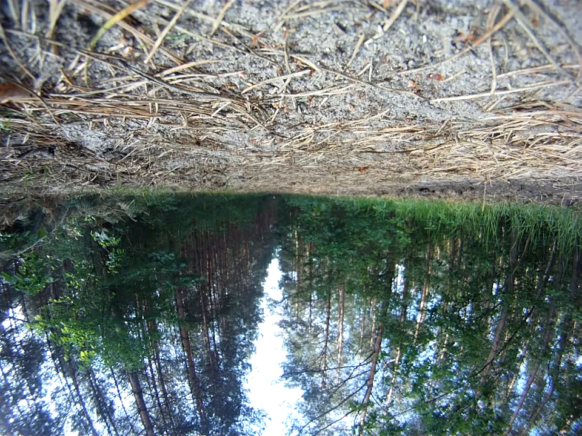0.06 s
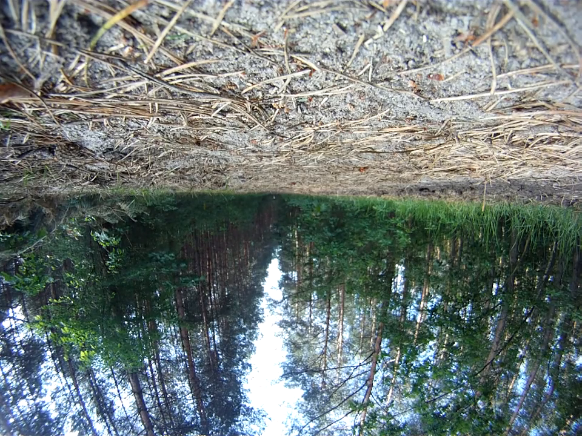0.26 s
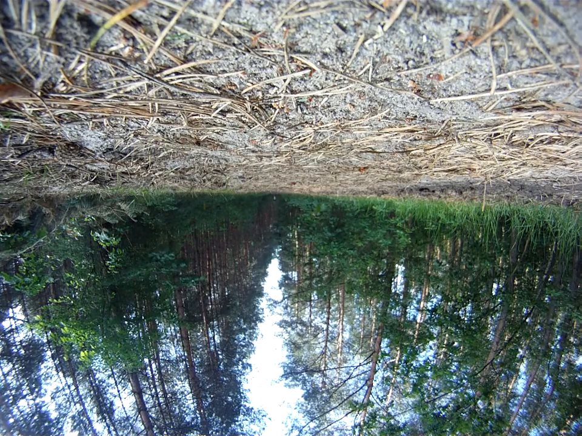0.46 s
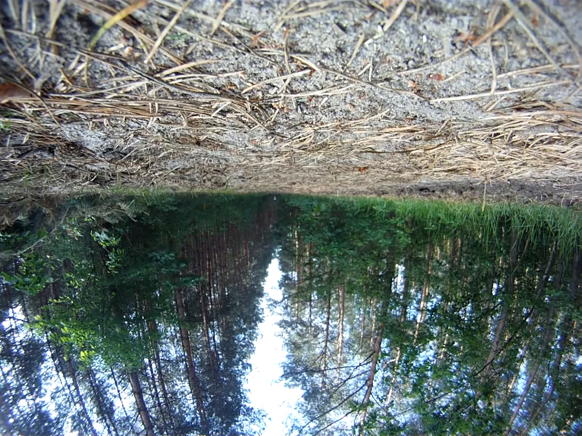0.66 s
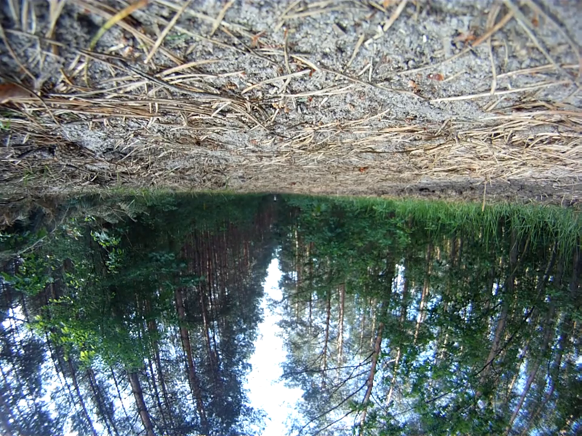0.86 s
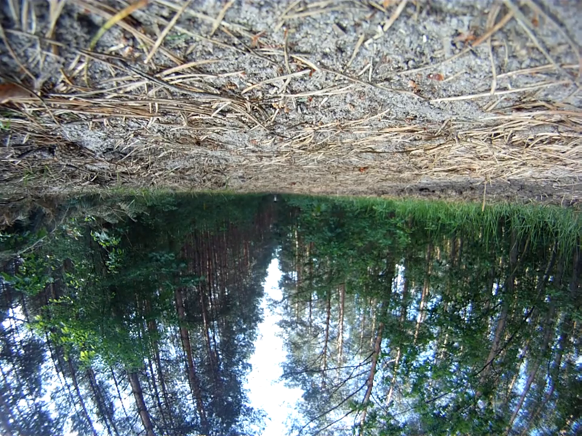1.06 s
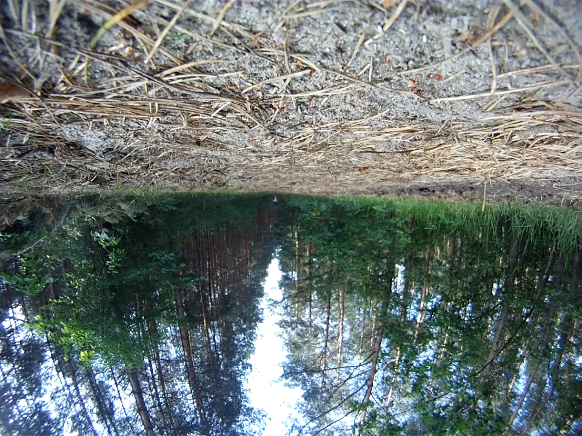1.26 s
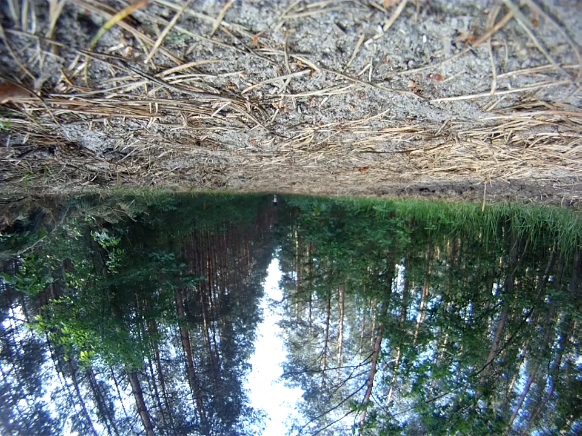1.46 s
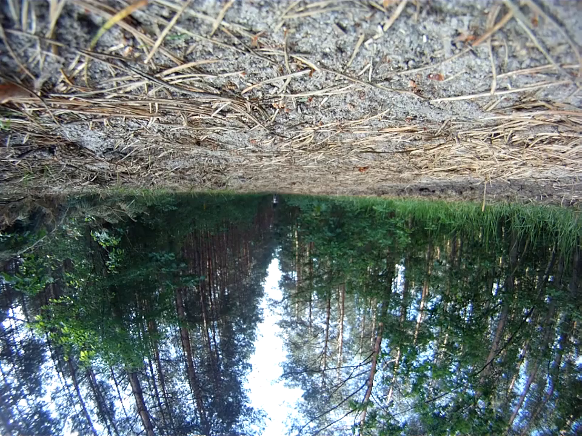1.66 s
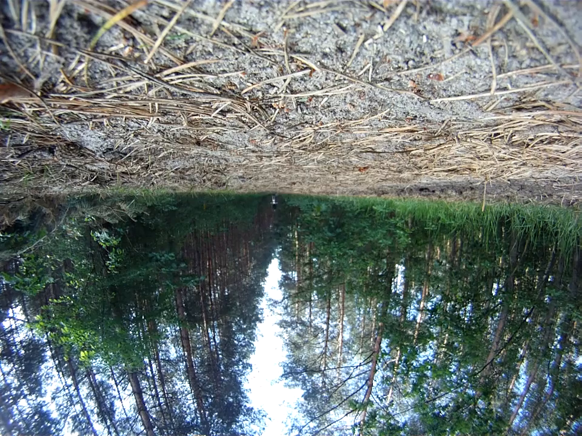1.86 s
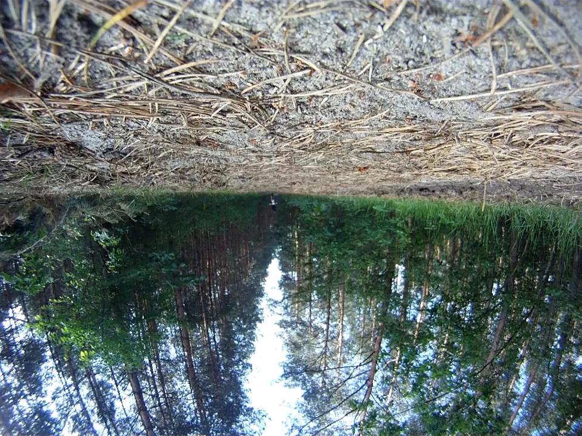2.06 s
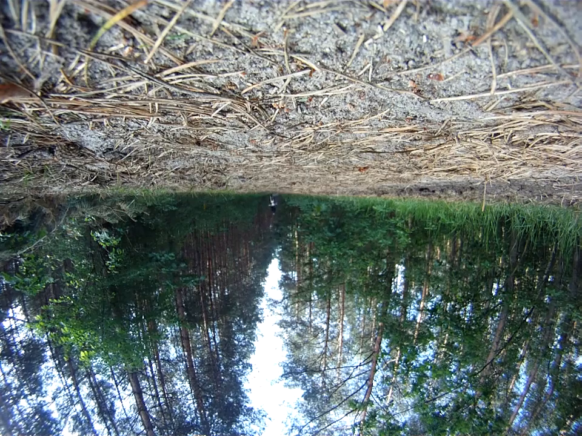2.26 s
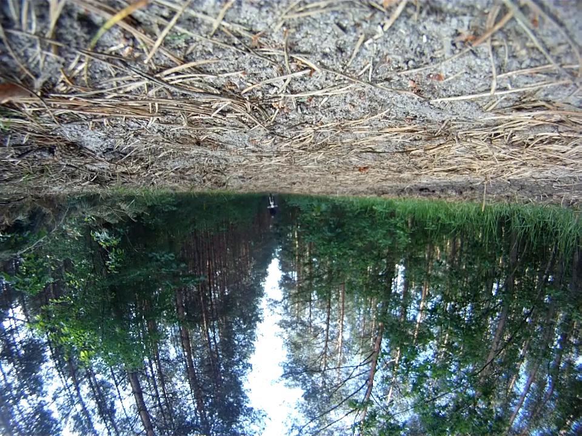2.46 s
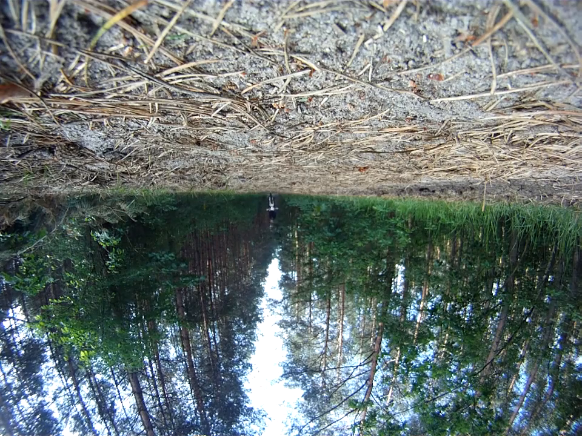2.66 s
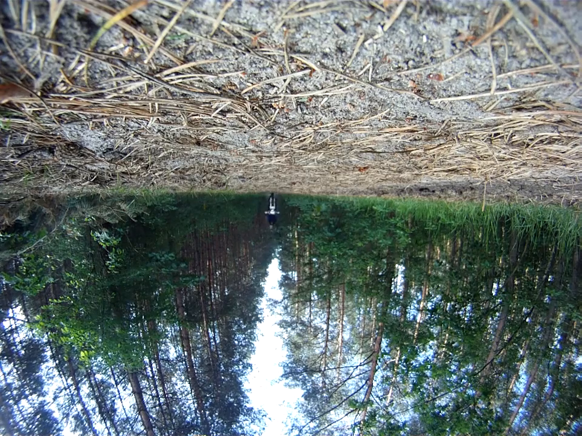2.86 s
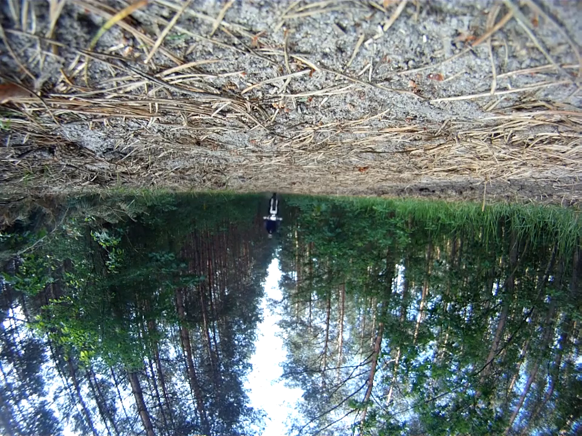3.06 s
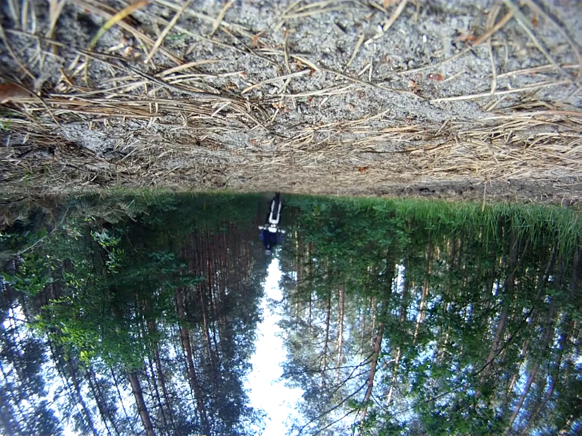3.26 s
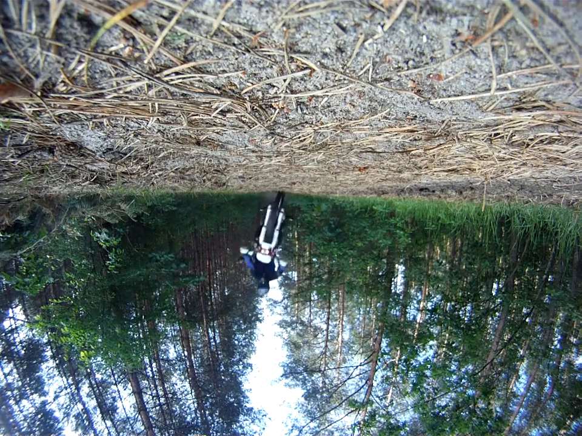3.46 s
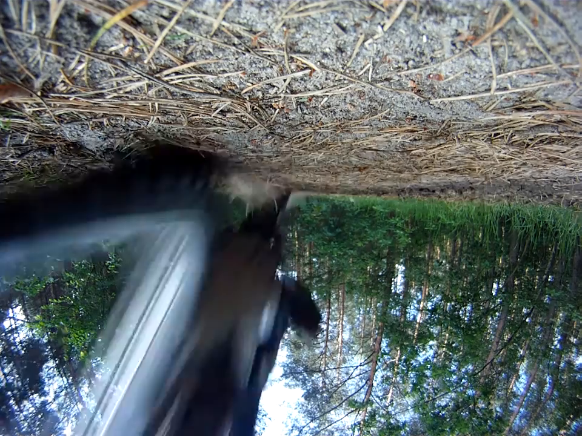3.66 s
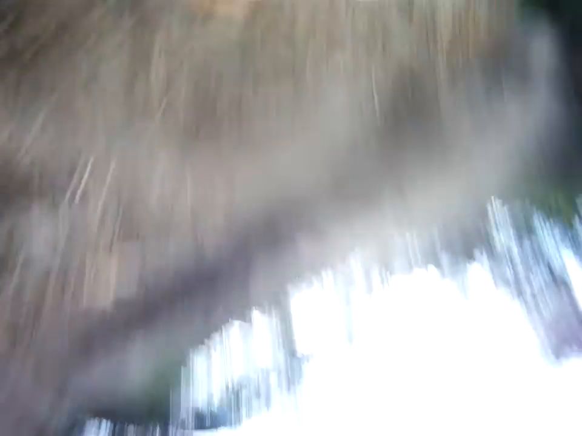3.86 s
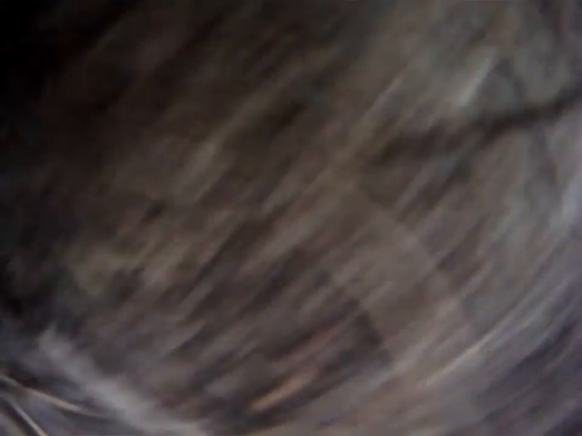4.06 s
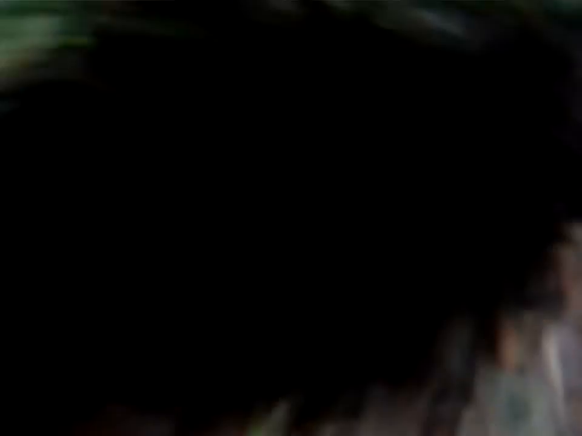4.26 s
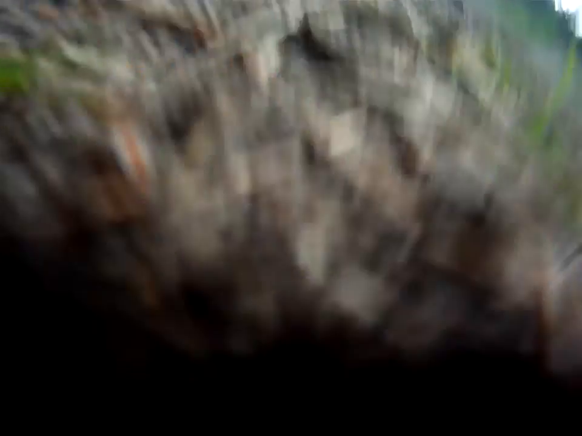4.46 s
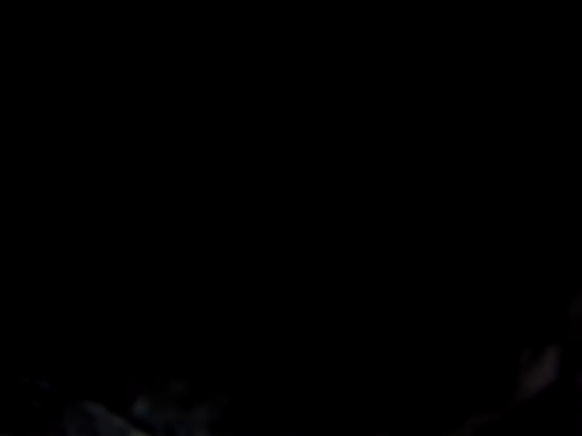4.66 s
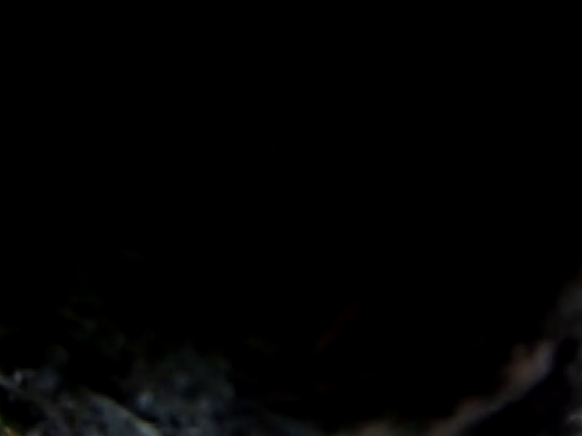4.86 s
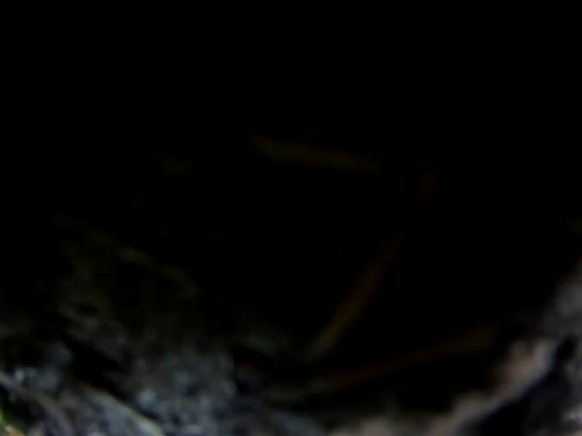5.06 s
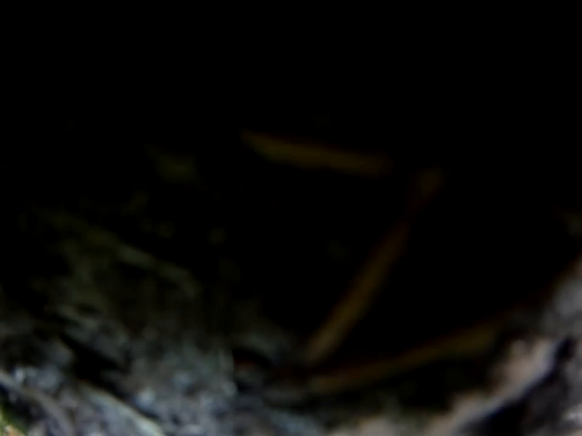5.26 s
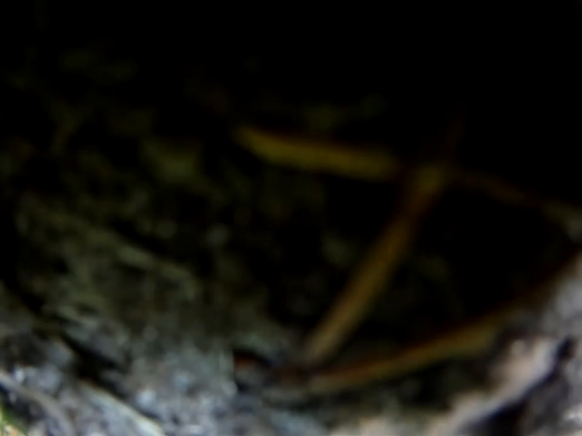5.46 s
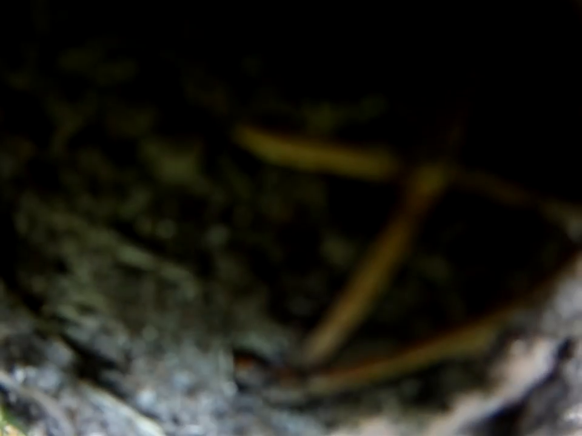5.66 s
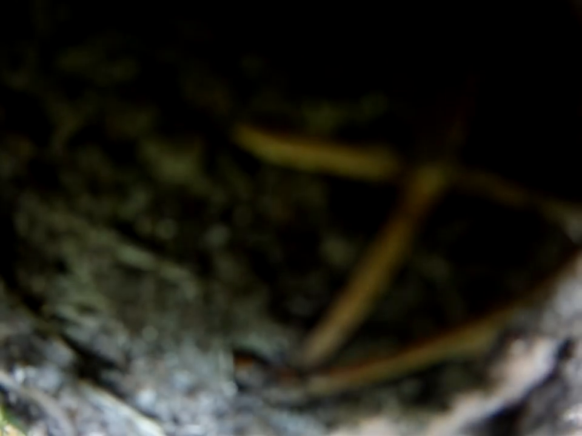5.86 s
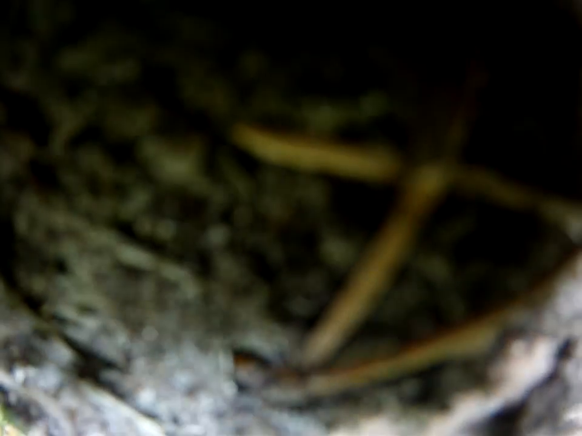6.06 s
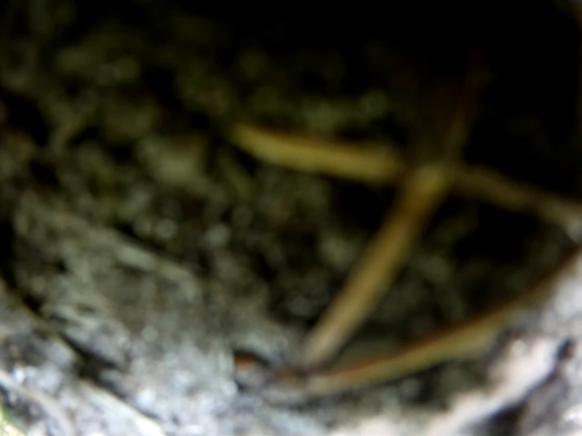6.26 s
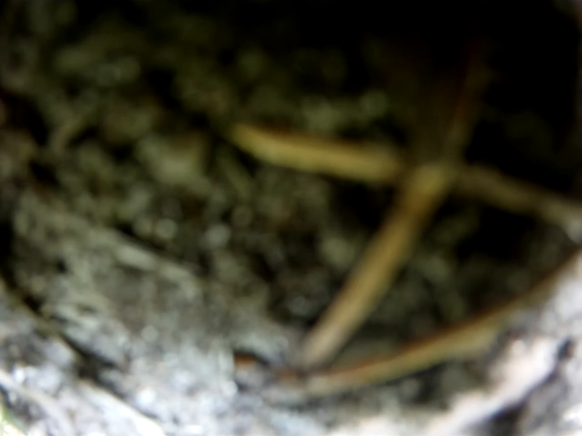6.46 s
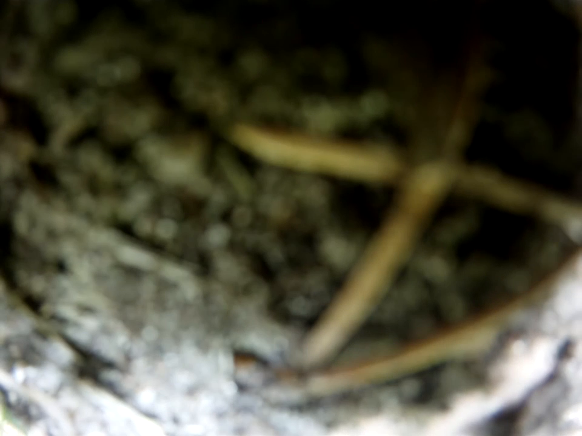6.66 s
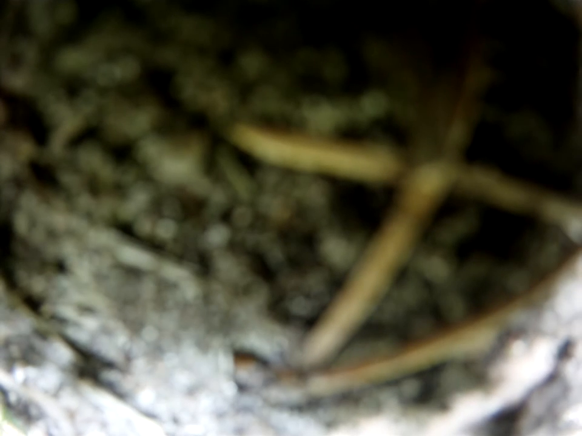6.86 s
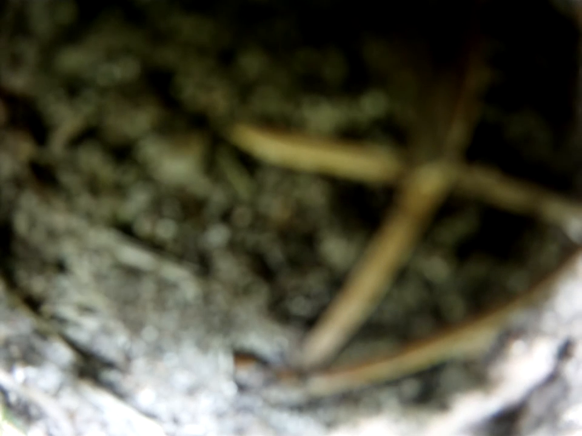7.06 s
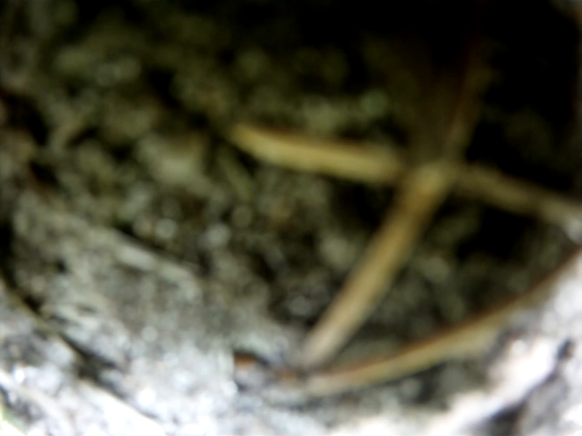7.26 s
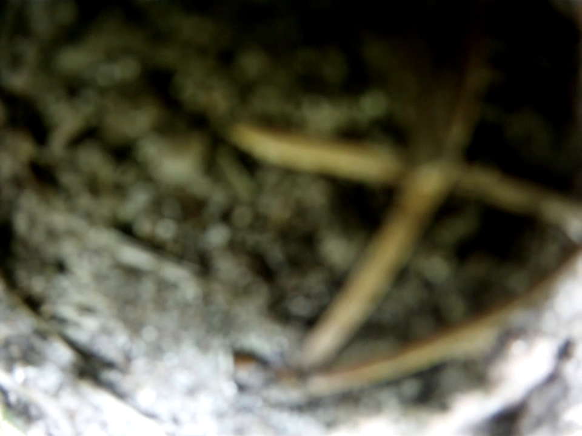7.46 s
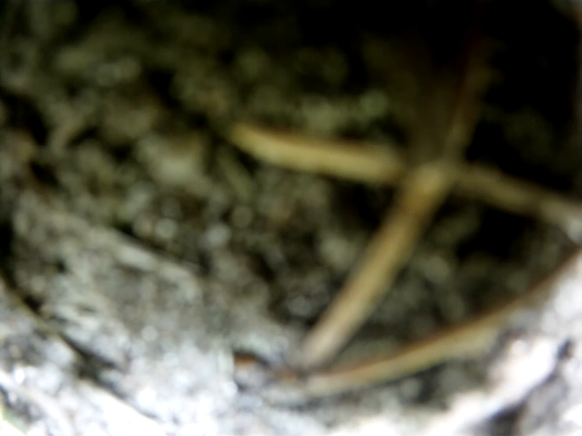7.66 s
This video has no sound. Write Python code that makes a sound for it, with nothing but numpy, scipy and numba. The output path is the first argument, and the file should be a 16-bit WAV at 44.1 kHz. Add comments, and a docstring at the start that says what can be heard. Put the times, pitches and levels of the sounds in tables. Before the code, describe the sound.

Heard from a small ground-level microphone in dry grass: faint forest air and a far-off four-stroke motorcycle, its firing pulses echoing among the trees. Chain, tyre and exhaust rush surges in under a second, stones crack hard against the plastic case, clipping the sound. The case tumbles with heavy separate thuds and crackly rustling, then the bike recedes with muffled, uneven puttering and spaced exhaust swells.

```python
"""A single-cylinder four-stroke dirt bike comes up a forest track and rides straight over a small camera on the ground.
Its silencer rings once per firing, over a rush of engine, chain and tyres; stones crack against the camera's case,
which tumbles through dry grass with heavy knocks as the bike putters away in short swells of boom and bark.
Firing impulses drive the silencer and puffs of gas; shaped noise makes the hiss, cracks, grass and faint forest air.
The camera's microphone is at ground level: its gain ducks late, its loud peaks clip and its extreme treble is cut."""
import sys
import numpy as np
from scipy import signal
from scipy.fft import rfft, irfft, next_fast_len
from scipy.io import wavfile
from scipy.ndimage import uniform_filter1d
from numba import njit

SR = 44100
rng = np.random.default_rng(int(sys.argv[2]) if len(sys.argv) > 2 else 0)


def wrap_up_sound(samples):
    """Save the sound to the file named by the first command line argument, as 16-bit audio."""
    columns = np.atleast_2d(samples).T
    # keep every value between -1 and 1, then stretch to whole-number steps
    tamed = np.clip(columns, -1, 1)
    steps = np.round(tamed * 32767).astype(np.int16)
    wavfile.write(sys.argv[1], SR, steps)


N = 340893
TIME = np.arange(N) / SR

# engine speed on the way in: time_s, firing_rate_hz
APPROACH_REVS = [(0.0, 41.0), (0.18, 43.62), (0.33, 40.44), (0.64, 29.58), (1.03, 37.39), (1.26, 36.24),
                 (1.36, 39.61), (1.95, 38.45), (2.25, 39.78), (2.56, 37.28), (2.89, 40.68), (3.16, 39.92),
                 (3.38, 41.26), (3.68, 44.96), (3.84, 44.68), (3.91, 42.23)]
# swells of boom and bark on the way out; most also lift the revs:
# start_s, length_s, revs_gained_hz, bark_db at 1 m, boom_db at 1 m
EXHAUST_SWELLS = [(4.4, .15, 8.5, -38, -28.5), (4.92, .11, 4.0, -23.5, -22), (5.093, 0.11, 0, -35, -33),
                  (5.37, 0.063, 0, -33.5, -32.5), (5.66, .15, 9.5, -25.5, -25),
                  (5.89, .08, 2.5, -35.5, -36.5), (6.09, .14, 10.5, -25.5, -22.5), (6.53, .08, 3, -33, -41),
                  (6.69, .07, 1.57, -38.5, -27.5), (7.33, 0.099, 14.48, -23.5, -25)]
# after the pass the revs sag steadily toward idle
COAST_S, SAG_HZ_PER_S, IDLE_HZ = 3.91, 19.96, 19.2


def revs():
    """Firings per second: most exhaust swells lift the revs, which otherwise sag to idle after the pass."""
    gained = sum(hz * np.clip((TIME - s) / length_s, 0, 1) for s, length_s, hz, _, _ in EXHAUST_SWELLS)
    sag = SAG_HZ_PER_S * np.maximum(TIME - COAST_S, 0)
    return np.maximum(curves(APPROACH_REVS)[0] + gained - sag, IDLE_HZ)


def firings(scatter_db=1.07, idle_scatter_db=2.0):
    """One impulse per firing; combustion is less even at low revs."""
    hz = revs()
    cycles = np.cumsum(hz) / SR + .54
    at = np.flatnonzero(np.diff(np.floor(cycles)))
    scatter = np.where(hz[at] > 32, scatter_db, idle_scatter_db)
    pulses = np.zeros(N)
    pulses[at] = undb(scatter * rng.standard_normal(len(at)))
    return pulses


# the ride: steady speed along the track, straight over the camera
SPEED_M_S, PASS_S, CLOSEST_M = 11.04, 3.813, 0.31
# the camera lies below the tailpipe's line of fire for the first metres after the pass
PIPE_HEIGHT_M, SHADOW_M = 0.42, 6
BEHIND_S, TURN_S = 3.874, 0.0044  # the front of the engine gives way to its tail


def distance(offset_m):
    """Metres from the camera to a part of the bike that misses it by offset_m."""
    return np.hypot(SPEED_M_S * (TIME - PASS_S), offset_m)


def behind():
    """0 while the bike comes on, 1 once it has passed the camera."""
    return np.clip((TIME - BEHIND_S) / TURN_S, 0, 1)


BOOM_DB, BARK_DB = -28, -29.5  # at 1 m, pulling toward the camera
IDLE_BOOM_DB, IDLE_BARK_DB = -34, -39.5  # at 1 m, throttle shut
BOOM_ATTACK_S, BOOM_RELEASE_S, BARK_ATTACK_S, BARK_RELEASE_S = 0.052, 0.21, 0.016, 0.038
# one early lift of the throttle
SHUT_S, SHUT_LENGTH_S, SHUT_BOOM_DB, SHUT_BARK_DB = .33, 0.32, -6, -20


def throttle():
    """Silencer boom and bark: steady under load, then in swells; the bark stops quickly, the boom lingers."""
    shut = swell(SHUT_S, SHUT_LENGTH_S, .06, 0.022)
    boom_out = undb(IDLE_BOOM_DB)
    bark_out = undb(IDLE_BARK_DB)
    for s, length_s, _, bark_db, boom_db in EXHAUST_SWELLS:
        boom_out = boom_out + undb(boom_db) * swell(s, length_s, BOOM_ATTACK_S, BOOM_RELEASE_S)
        bark_out = bark_out + undb(bark_db) * swell(s, length_s, BARK_ATTACK_S, BARK_RELEASE_S)
    coming = (1 - behind()) / distance(PIPE_HEIGHT_M)
    going = behind() / distance(SHADOW_M)
    boom = coming * undb(BOOM_DB + SHUT_BOOM_DB * shut) + going * boom_out
    bark = coming * undb(BARK_DB + SHUT_BARK_DB * shut) + going * bark_out
    return boom, bark


# low and upper silencer resonances, heard from ahead and from behind: pitch_hz, width_hz, level_db
AHEAD_LOW_MODES = [(88, 100, 4), (125, 35, -2), (219.5, 63, -1.5)]
AHEAD_UPPER_MODES = [(357, 43, -2), (472, 120, 1.5), (542, 91, 0), (692, 49, -3)]
BEHIND_LOW_MODES = [(74.4, 61, 2.5), (104, 51, 2), (187, 57, -11), (254, 42, 2)]
BEHIND_UPPER_MODES = [(329, 51, 3), (430, 80, -5), (600, 81, -12)]
GULP_S, GULP_DB = .0071, -5  # the airbox gulps this long after each firing, heard from ahead


def exhaust(pulses, boom_gain, bark_gain):
    """Each firing rings the silencer; open throttle brings out its upper modes; the intake sucks in between."""
    def voice(strokes, boom_modes, bark_modes, top_hz):
        """The silencer as heard from one side."""
        boom = cut(cut(ring(strokes, boom_modes), 300, "low", order=4), 40, "high")
        bark = cut(cut(ring(pulses, bark_modes), top_hz, "low", order=6), 220, "high")
        return unit(boom) * boom_gain + unit(bark) * bark_gain

    gulps = undb(GULP_DB) * np.interp(TIME - GULP_S, TIME, pulses)
    from_ahead = voice(pulses - gulps, AHEAD_LOW_MODES, AHEAD_UPPER_MODES, 760)
    from_behind = voice(pulses, BEHIND_LOW_MODES, BEHIND_UPPER_MODES, 600)
    return from_ahead * (1 - behind()) + from_behind * behind()


# the exhaust jet sweeps the case
JET_S, JET_LENGTH_S, JET_ATTACK_S, JET_RELEASE_S = 3.915, .115, .03, .012
JET_DB, JET_BOOM_DB = -31.5, -40  # its hiss, and the low thump inside it


def jet():
    """How squarely the exhaust jet hits the case, 0-1."""
    return swell(JET_S, JET_LENGTH_S, JET_ATTACK_S, JET_RELEASE_S)


# distant treble on the way in: time_s, level_db
DISTANT_HISS = [(0.0, -53), (0.36, -51.5), (0.74, -61.5), (0.94, -53), (1.27, -50.5), (1.63, -52.5),
                (1.66, -51), (2.37, -54), (2.6, -59), (2.95, -52)]
# chain and tyres: level before the spreading and the loss into the verge
RUSH_DB, GRASS_LOSS_DB_PER_M = -23.5, 1.25
GAS_DB, GAS_PER_BOOM_DB = -44, -18.5  # hiss from behind at 1 m, and its part that grows with the boom
# share of the hiss power that comes in puffs with the firings
PUFF_FAR, PUFF_NEAR, PUFF_BEHIND = .03, 0.092, .45


def airflow(boom):
    """Hiss gain and puffing share: distant hiss, chain and tyres close by, exhaust jet, then gas from behind."""
    r = distance(CLOSEST_M)
    far = (1 - behind()) * undb(curves(DISTANT_HISS)[0])
    rush = (1 - behind()) * undb(RUSH_DB - GRASS_LOSS_DB_PER_M * r) / r
    blast = undb(JET_DB) * jet()
    gas = behind() * (undb(GAS_DB) / distance(SHADOW_M) + undb(GAS_PER_BOOM_DB) * boom)
    power = far ** 2 + rush ** 2 + blast ** 2 + gas ** 2
    puffing = PUFF_FAR * far ** 2 + PUFF_NEAR * rush ** 2 + blast ** 2 + PUFF_BEHIND * gas ** 2
    return np.sqrt(power), np.clip(puffing / power, 0, 1)


# hiss spectra at a distance and beside the camera: pitch_hz, level_db
FAR_HISS_SPECTRUM = [(470, -35.5), (800, -6.5), (1050, -9.5), (1350, -4.5), (1520, -13.5), (1740, -10.5),
                     (1930, -2.5), (2410, -1), (2870, -14), (3250, -10.5), (4300, -21.5), (5400, -24.5),
                     (5970, -32.5), (6590, -28), (8900, -21.5), (9680, -12), (10500, -25), (11900, -29.5),
                     (13300, -27), (14300, -15.5), (15500, -27)]
NEAR_HISS_SPECTRUM = [(290, -34.5), (500, -6), (792, -5.5), (1010, -8), (1290, -5.5), (1620, -13),
                      (2150, -4), (2550, -1.5), (2950, -13), (4250, -25), (5280, -19), (5920, -38.5),
                      (6640, -25.5), (9510, -22.5), (12000, -21.5), (14600, -22.5), (15500, -33)]
# resonances of the camera's plastic case, also rung by the cracks: pitch_hz, width_hz, level_db
CASE_MODES = [(850, 55, -4), (1110, 240, -2.5), (1320, 220, -5.5), (1700, 370, -6.5), (2190, 340, 7),
              (2327, 220, 0.5), (3380, 220, -5.5), (5166, 780, -16.5), (6470, 620, -13), (8200, 550, -9),
              (9340, 190, -5), (14400, 900, -6.5)]


def hiss(pulses, gain, share, puff_s=.0014, near_db=-2, case_db=-4,
         rasp_db=1, rasp_reach_m=2.5, rasp_behind_db=-12, spit_db=-7):
    """Steady rush of chain and tyres plus a puff of gas per firing; close by it rasps and rings the case."""
    puffs = unit(burst(burst(pulses, puff_s), puff_s))
    gate = np.sqrt(1 - share + share * puffs ** 2)
    far_sound = unit(colour(noise() * gate, FAR_HISS_SPECTRUM))
    # from behind, the tailpipe spits at each stroke
    spit_mode = [(1940, 440, 0)]
    spit = ring(ring(noise() * puffs, spit_mode), spit_mode)
    far_sound += behind() * unit(spit) * undb(spit_db)
    near_sound = unit(colour(noise() * gate, NEAR_HISS_SPECTRUM)) * undb(near_db)
    near_sound += unit(ring(noise() * gate, CASE_MODES)) * undb(case_db)
    # the turbulent front of each stroke only survives close to the pipe
    rasp = ring(noise() * puffs, [(760, 170, 2.5), (950, 220, -2), (1270, 220, -4)])
    rasp_gain = undb(rasp_db + rasp_behind_db * behind()) / np.hypot(1, distance(0) / rasp_reach_m)
    near_sound += unit(cut(rasp, 1500, "low", order=4)) * rasp_gain
    near = np.interp(TIME, [2.8, 3.6, 4.1, 4.8], [0, 1, 1, 0])
    flutter = undb(.6 * walk(14))
    return (np.sqrt(1 - near) * far_sound + np.sqrt(near) * near_sound) * gain * flutter


# hard blows on the case: peak_s, level_db, rise_s, decay_s, body_db (hollow body relative to the shell)
CASE_BLOWS = [(3.771, -17, 0.001, .0016, 11), (3.8094, -9, 0.0015, 0.0017, -5),
              (3.817, -9, 0.00069, 0.0015, 8), (3.8323, -6, 0.00094, 0.0012, 1),
              (3.8506, 13.5, .0025, 0.0017, -0.5), (3.869, -10, .002, 0.0032, 0),
              (3.908, -30.5, .001, 0.0027, -10), (3.9581, -15.5, 0.0017, 0.0026, -23),
              (4.0852, 7, .0026, .0016, 8), (4.194, -13, .002, .0032, -34), (4.199, -12, 0.0013, .0022, -7),
              (4.2078, -13.5, 0.0018, 0.0025, -13), (4.3758, 6, 0.0012, 0.0017, -12.5),
              (4.5743, -10, 0.00068, 0.0032, -30), (4.583, -16, 0.002, 0.0023, -20),
              (4.7292, -26.5, 0.0027, .004, -6.5), (4.874, -38, 0.0018, .0015, -5),
              (4.905, -35, .0014, .0012, -5), (5.059, -31.5, .0014, 0.0016, -20),
              (5.072, -36.5, .0014, 0.0014, -17), (5.107, -39, 0.0041, 0.0048, -28)]


def cracks(dull_hz=12000):
    """Each blow is a short gritty crunch that rings the case and its hollow body."""
    force, push = 0, 0
    for s, db, rise_s, decay_s, body_db in CASE_BLOWS:
        contact = blow(s, rise_s, decay_s)
        force = force + undb(db) * contact
        push = push + undb(db + body_db) * contact
    grit = noise()
    # broad resonances give each crack a short, dry ring
    broad_modes = [(hz, max(width, hz / 6), db) for hz, width, db in CASE_MODES]
    shell = cut(ring(grit * force, broad_modes), dull_hz, "low", order=1) / np.std(ring(grit, broad_modes))
    body_modes = [(310, 280, -0.32), (720, 470, 0), (1000, 200, 2.5)]
    body = ring(grit * push, body_modes) / np.std(ring(grit, body_modes))
    return shell + body


# the case landing on soft ground: centre_s, level_db, contact_s, snap (reversal: higher is more abrupt)
LANDINGS = [(3.8321, -5.5, 0.0017, 4.9), (3.853, -13.5, 0.0016, 1.7), (4.085, 0.5, 0.0036, 14),
            (4.1986, -3.5, 0.0022, 3.8), (4.2098, 4, .0027, 1.74), (4.3763, 9.5, 0.0024, 2.9),
            (4.489, -19, 0.0053, 1.9), (4.5838, 6.5, 0.0032, 5.5), (4.7283, -8.5, 0.005, 1.54),
            (4.751, -17, 0.0073, 1.5)]


def thuds():
    """Each landing is heard as one swing: a dip down, then an abrupt jump upward."""
    out = np.zeros(N)
    for s, db, contact_s, snap in LANDINGS:
        u = (TIME - s) / contact_s
        out += undb(db) * np.tanh(snap * u) * np.exp(-u ** 2 / 2)
    return out


# a metal part of the bike as it jolts away: strike_s, pitch_hz, level_db, decay_s
METAL_STRIKES = [(3.982, 830, -35, 0.013), (4.005, 819, -31, 0.02), (4.028, 800, -30, 0.015)]


def clangs():
    """A jolted metal part rings as short, fading sine tones."""
    return sum(undb(db) * blow(s, .001, decay_s) * np.sin(2 * np.pi * hz * (TIME - s))
               for s, hz, db, decay_s in METAL_STRIKES)


# the case sliding through dry grass: start_s, length_s, level_db, buzz_db (stalks relative to the slide)
GRASS_SLIDES = [(4.069, 0.12, -47, -10), (4.243, 0.094, -34.5, -10), (4.321, 0.053, -35.5, -6),
                (4.411, 0.057, -50.5, -12), (4.462, 0.05, -40.5, -14), (4.504, 0.096, -37.5, -16),
                (4.624, 0.0097, -34, -17), (4.629, 0.074, -35, -4.5), (4.698, 0.094, -43, -4),
                (4.818, 0.059, -43, -12), (4.853, 0.071, -39.5, -2), (4.903, 0.1, -53, 2),
                (5.017, 0.071, -46.5, -4)]
# rustle of the dry grass against the case: pitch_hz, level_db
GRASS_SPECTRUM = [(240, -51), (400, -21.5), (1000, -7.5), (1200, -11.5), (2220, -1.5), (2970, -11.5),
                  (3570, -2), (4560, -22.5), (5310, -14), (6000, -18.5), (6680, -22.5), (9650, -12.5),
                  (11800, -38), (13900, -21.5), (15500, -30.5)]


def scrapes(grain_db=6, snag_db=2.0, rumble_db=-5):
    """Dry stalks snag, buzz and crackle along the case, which rumbles as it rolls."""
    slides = np.array([undb(db) * np.sin(np.pi * np.clip((TIME - s) / length_s, 0, 1))
                       for s, length_s, db, _ in GRASS_SLIDES])
    buzz = undb([row[3] for row in GRASS_SLIDES]) @ slides
    # a new random level every 20 samples makes the grass crackle
    crackle = np.repeat(rng.standard_normal(N // 20 + 1), 20)[:N]
    grains = noise() * undb(grain_db * crackle + snag_db * walk(220))
    stalks = ring(grains, [(1680, 76, 5), (2350, 200, -1.5), (8700, 400, -12), (14300, 700, -12)])
    rustle = unit(colour(grains, GRASS_SPECTRUM))
    rumble = undb(rumble_db) * unit(cut(noise(), 130, "low"))
    return slides.sum(0) * (rustle + rumble) + buzz * unit(stalks)


# grains of sand dropping on the case: peak_s, level_db
SAND_GRAINS = [(4.99, -46), (5.175, -45), (5.818, -55), (6.893, -48)]


def ticks(decay_s=.0025):
    """Each sand grain is a tiny bright click of resonant noise."""
    bright = unit(ring(noise(), [(3480, 650, 9), (7200, 3300, -6)]))
    return bright * sum(undb(db) * blow(s, 0.00017, decay_s) for s, db in SAND_GRAINS)


def trees(x, wet_db, t60_s):
    """Trunks scatter the sound into a diffuse tail."""
    t = TIME[:SR]
    echoes = rng.standard_normal(SR) * undb(-60 * t / t60_s) * (1 - np.exp(-t / 0.0067))
    return x + undb(wet_db) * signal.fftconvolve(x, echoes / np.linalg.norm(echoes))[:N]


# air of the forest at the microphone: pitch_hz, level_db
FOREST_SPECTRUM = [(15, -31.5), (25, -8.5), (49, 2), (648, -11.5), (703, -15.5), (1490, -19.5), (3260, -24),
                   (5580, -25.5), (8810, -32), (11800, -34.5), (15500, -33.5)]


def forest(level_db=-59.5):
    """Faint, even background of shaped noise."""
    return unit(colour(noise(), FOREST_SPECTRUM)) * undb(level_db)


def undb(db):
    """Decibels to gain."""
    return 10 ** (np.asarray(db) / 20)


def unit(x):
    """Scale to rms 1."""
    return x / np.sqrt(np.mean(x ** 2))


def curves(rows):
    """Each column of a table, joined by straight lines in time."""
    s, *columns = np.transpose(rows)
    return [np.interp(TIME, s, c) for c in columns]


def noise():
    """White noise."""
    return rng.standard_normal(N)


def walk(rate):
    """Slow chance with a spread near 1, heading for a new value rate times a second."""
    k = int(SR / rate)
    steps = np.repeat(rng.standard_normal(N // k + 1), k)
    return 1.3 * uniform_filter1d(steps, k)[:N]


def colour(x, points):
    """Shape a sound with a (pitch_hz, level_db) spectrum."""
    hz, db = np.transpose(points)
    size = next_fast_len(N)
    f = np.maximum(np.fft.rfftfreq(size, 1 / SR), 1)
    gain = undb(np.interp(np.log(f), np.log(hz), db))
    return irfft(rfft(x, size) * gain, size)[:N]


def ring(x, modes):
    """Sum of damped resonances (pitch_hz, width_hz, level_db)."""
    return sum(undb(db) * signal.lfilter(*signal.iirpeak(hz, hz / width, fs=SR), x) for hz, width, db in modes)


def cut(x, hz, kind, order=2):
    """Low-pass or high-pass."""
    return signal.sosfilt(signal.butter(order, hz, kind, fs=SR, output="sos"), x)


def burst(x, decay_s):
    """Give every impulse an exponential tail."""
    return signal.lfilter([1], [1, -np.exp(-1 / (SR * decay_s))], x)


def blow(s, rise_s, decay_s):
    """Force of a contact: a quick build-up to time s, then a decay."""
    return np.exp(np.maximum(np.minimum((TIME - s) / rise_s, (s - TIME) / decay_s), -30))


def swell(s, length_s, attack_s, release_s):
    """Attack, hold and release, 0-1."""
    attack = np.clip((TIME - s) / attack_s, 0, 1)
    release = np.exp(-np.clip((TIME - s - length_s) / release_s, 0, 40))
    return attack * release


@njit
def follow(x, attack, release):
    """Level follower that rises quickly and sinks slowly."""
    out, e = np.empty(len(x)), 0.
    for i in range(len(x)):
        e += (abs(x[i]) - e) * (attack if abs(x[i]) > e else release)
        out[i] = e
    return out


def scene():
    """The bike passes through the trees and over the camera, which tumbles in the grass."""
    pulses = firings()
    boom, bark = throttle()
    thump = undb(JET_BOOM_DB) * jet()
    pipe = exhaust(pulses, boom + thump, bark + thump)
    # the trees only answer audibly while the bike is far off
    far = np.interp(TIME, [2.5, 3.5, 4.5, 5], [1, 0, 0, .4])
    bike = trees(pipe * far, wet_db=-9, t60_s=.7) + pipe * (1 - far)
    bike = bike + hiss(pulses, *airflow(boom))
    return (bike + cracks() + thuds() + clangs() + scrapes() + ticks() + forest())[None]


def record(dry, notch_width_hz=1100, limit_db=-7, attack_s=0.0045, release_s=0.019, bass_hz=38, top_hz=15400):
    """The camera ducks too late to avoid overload, thins the bass, dips twice in the treble and cuts the top."""
    level = follow(dry[0], 1 / (attack_s * SR), 1 / (release_s * SR))
    ducked = dry / np.maximum(1, level / undb(limit_db))
    wet = cut(np.clip(ducked, -1, 1), bass_hz, "high", order=1)
    for hz in (6000, 12000):
        wet = signal.lfilter(*signal.iirnotch(hz, hz / notch_width_hz, fs=SR), wet)
    top_cut = signal.ellip(8, .2, 70, top_hz, fs=SR, output="sos")
    return signal.sosfilt(top_cut, np.clip(wet, -.9, .9))


dry = scene()
out = record(dry)
wrap_up_sound(out)
```